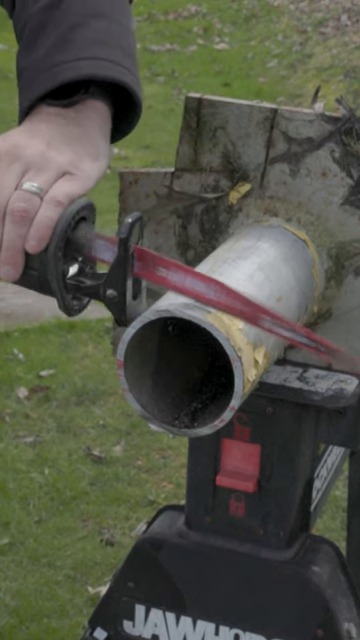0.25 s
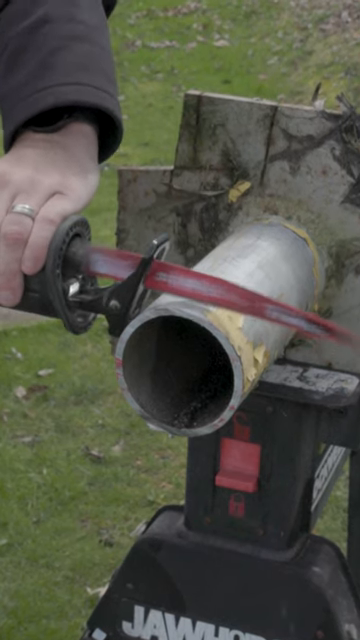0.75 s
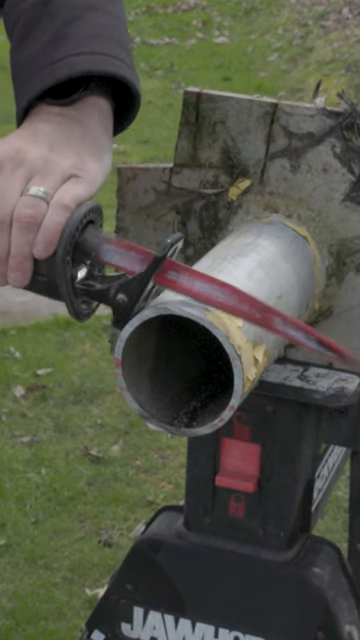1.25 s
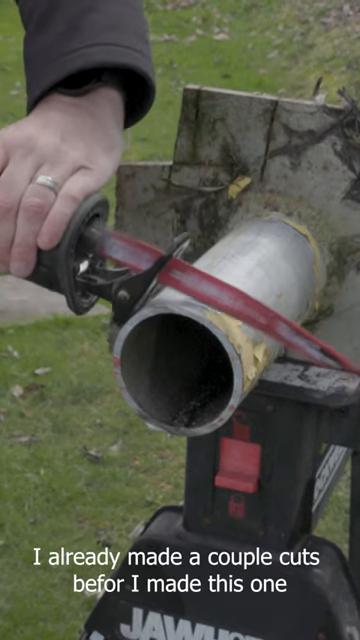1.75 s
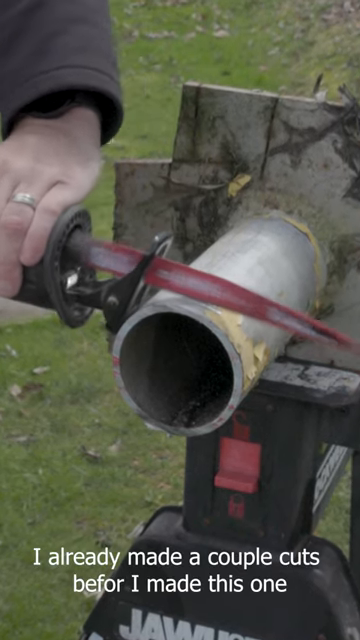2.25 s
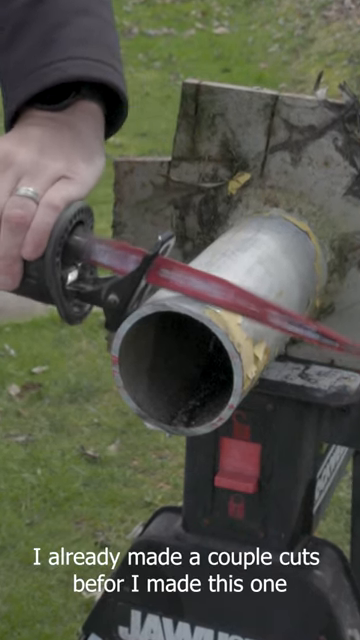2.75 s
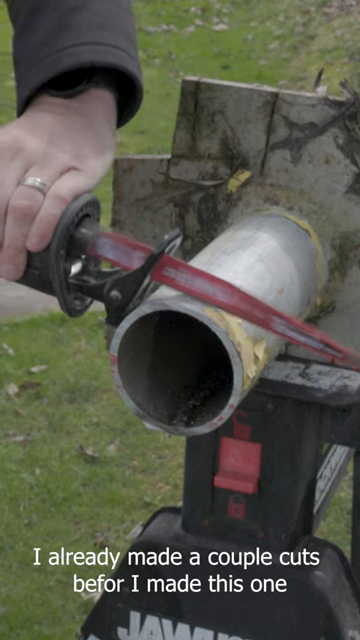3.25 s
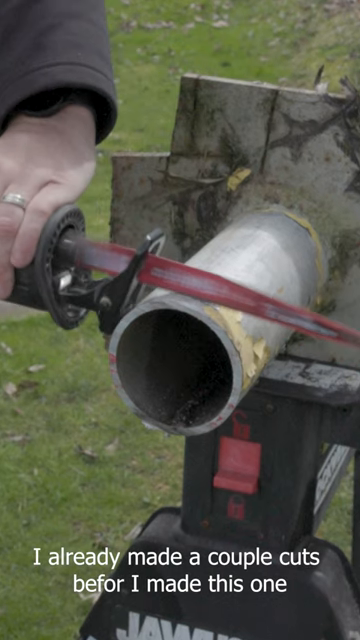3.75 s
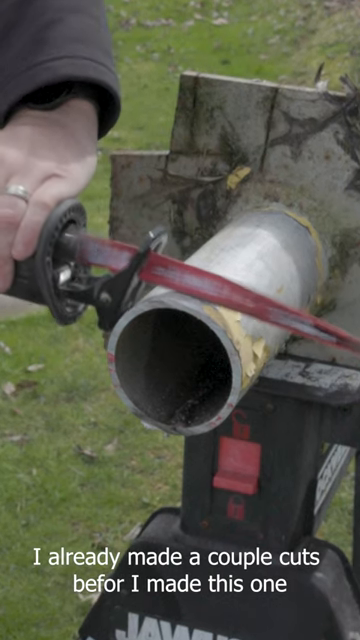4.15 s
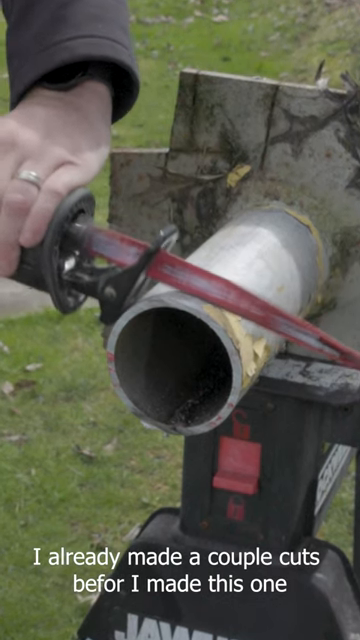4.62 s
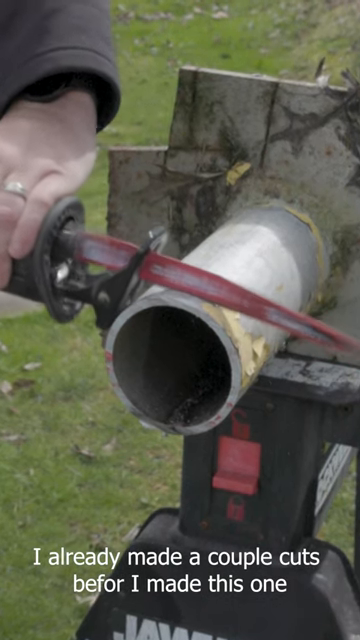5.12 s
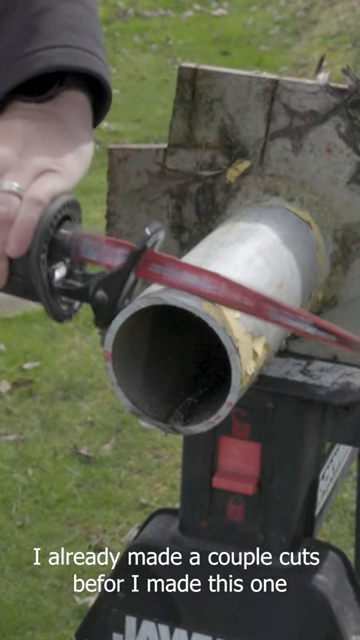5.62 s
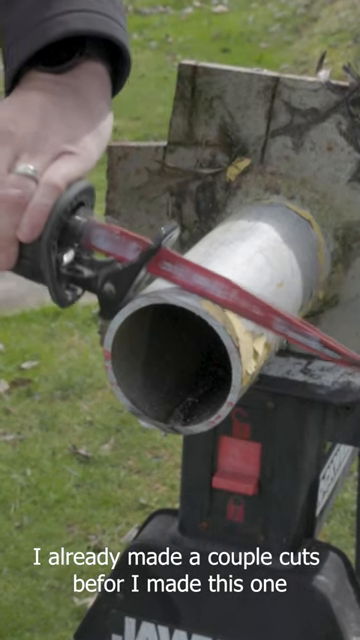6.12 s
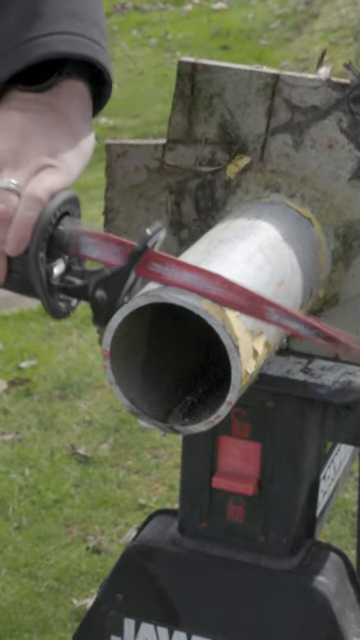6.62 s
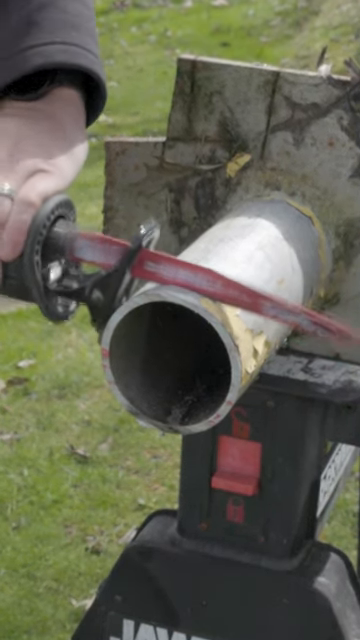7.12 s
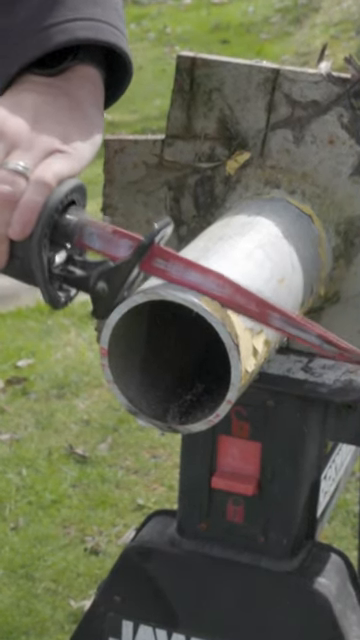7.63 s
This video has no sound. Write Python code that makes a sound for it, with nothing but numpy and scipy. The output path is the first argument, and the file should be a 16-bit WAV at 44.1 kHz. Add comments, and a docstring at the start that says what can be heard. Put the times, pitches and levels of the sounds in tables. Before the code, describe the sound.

Close and dry, a power saw chews through hollow steel on a clamping stand. Its high whine stays steady, trembling slightly under load, over airy hiss and low vibration. About fifty strokes a second rasp into a rough buzz. The pipe's ring flickers between mid and high tones, with dense clanging catches around three seconds, then more tooth chatter and lower ringing. The cutting continues to the end without stopping.

```python
"""First heard is a motor's whine near 3.3 kHz and a rubbing hiss; then a steel pipe rings as a saw cuts it.
A crank drives the reciprocating saw some fifty times a second: sines phase-locked to it make whine and hum.
Each stroke is a rising train of tooth impulses and a burst of spiky noise, shaped by fixed spectra.
The pipe is a bank of decaying modes, restarted by every cut and driven harder by listed knocks.
Filtered noise supplies the cooling air, the rumble, the rattle and a bright ping."""
import sys
import numpy as np
from scipy.fft import rfft, irfft, next_fast_len
from scipy.io import wavfile
from scipy.ndimage import uniform_filter1d, map_coordinates

SR = 44100
rng = np.random.default_rng(int(sys.argv[2]) if len(sys.argv) > 2 else 0)


def waveform_to_disk(signal):
    """Save audio, clipped to [-1, 1], as 16-bit WAV at the path in sys.argv[1]."""
    frames = np.transpose(np.atleast_2d(signal))
    scaled = np.clip(frames, -1, 1) * 32767
    samples = np.round(scaled).astype(np.int16)
    wavfile.write(sys.argv[1], SR, samples)


N = 347508  # samples


def amp(db):
    """Decibel law: 20 dB is a factor of ten in amplitude."""
    return 10 ** (np.asarray(db) / 20)


def unit(x):
    """Normalisation to a root-mean-square value of 1."""
    return x / np.sqrt(np.mean(x ** 2) + 1e-20)


def noise():
    """White noise: equal mean power at all frequencies."""
    return rng.standard_normal(N)


def curves(rows):
    """Linear interpolation: one value per sample for each column after the time."""
    s, *cols = np.transpose(rows)
    return [np.interp(np.arange(N) / SR, s, c) for c in cols]


def wobble(rate):
    """Band-limited fluctuation: a smooth random curve with rate knots a second."""
    return map_coordinates(rng.standard_normal(int(N * rate / SR) + 4), [np.arange(N) * rate / SR])


def filtered(x, response):
    """Linear filtering: the spectrum of x times a response of frequency."""
    m = next_fast_len(N + SR // 2)
    return irfft(rfft(x, m) * response(np.fft.rfftfreq(m, 1 / SR)), m)[:N]


def coloured(x, points):
    """Spectral shaping: x through a (frequency [Hz], gain [dB]) curve, then set to rms 1."""
    f, db = np.transpose(points)
    return unit(filtered(x, lambda hz: amp(np.interp(np.log(hz + 1), np.log(f), db))))


# crank speed: (time [s], rate [strokes per second])
CRANK_SPEED = [(0, 51.5), (0.25, 50.95), (0.4, 50.2), (0.48, 49.96), (0.78, 49.68), (1.09, 50.04),
               (1.74, 50.24), (1.98, 49.58), (2.35, 49.8), (2.79, 49.29), (3.4, 50.29), (3.46, 49.29),
               (3.98, 49.9), (4.14, 48.86), (4.34, 49.26), (4.91, 49.25), (5.12, 48.45), (5.36, 48.86),
               (5.63, 49.01), (5.74, 49.41), (6.36, 49.94), (6.76, 48.48), (7.14, 48.15), (7.4, 49.05),
               (7.67, 49.61), (7.88, 49.6)]


def crank():
    """Phase is the integral of rate: turns of the crank since the start."""
    return np.cumsum(curves(CRANK_SPEED)[0]) / SR


def stroke(centre, scatter_db):
    """Cyclic phase: place in the stroke (-.5 to .5, 0 at centre) and a chance strength for each stroke."""
    turns = crank() - centre + 1.5
    whole = turns.astype(int)
    return turns - whole - .5, amp(scatter_db * rng.standard_normal(whole.max() + 1))[whole]


def bump(place, width):
    """Gaussian window: a smooth swell around place 0."""
    return np.exp(-.5 * (place / width) ** 2)


# shaking of saw and stand, relative levels:
# (time [s], rocking at the stroke rate [dB], middle hum [dB], upper hum [dB], body [dB])
SHAKE_LEVELS = [(0.0, -81, -55, -50.5, -46), (0.28, -79, -55.5, -53.5, -46.5),
                (2.43, -81, -59.5, -49, -45.5), (2.7, -71, -63, -53, -45.5), (2.72, -70, -57, -51.5, -46.5),
                (3.36, -73, -54, -53, -47), (3.49, -66, -56, -45, -45.5), (3.58, -73, -51, -51.5, -46),
                (4.02, -74, -53.5, -47, -47.5), (4.32, -61, -55, -52, -44),
                (5.02, -64, -47.5, -44.5, -45.5), (5.33, -67, -55.5, -54.5, -45),
                (6.28, -63, -52, -48.5, -44.5), (7.13, -68, -55.5, -55.5, -44.5),
                (7.55, -61, -55, -49.5, -45.5), (7.7, -67, -69, -45, -45.5), (7.84, -63, -52, -50, -42.5),
                (7.88, -67, -55, -50, -49)]
# low hum: (multiple of the stroke rate, relative level [dB], wavering before looseness [dB])
LOW_HUM = [(2, -65.5, -1.3), (3, -72, 3), (4, -66.5, 3)]
# middle hum, then upper hum: (multiple of the stroke rate, level relative to its band [dB])
HUM_BANDS = [
    [(5, -4), (6, -3)],
    [(8, -4), (9, 0.5)],
]
# body buzz: (multiple of the stroke rate, level relative to the body [dB])
BODY_ORDERS = [(7, -19.5), (10, -13.5), (11, -21), (12, -42), (13, -18.5), (14, -13.5), (15, -10.5),
               (16, -19), (17, -44)]
# noise spectra of rattle and rumble: (frequency [Hz], relative level [dB])
RATTLE_SPECTRUM = [(25, -60), (70, -42), (150, -19), (300, -3.5), (450, 0), (800, 0), (1000, -27),
                   (1500, -44)]
RUMBLE_SPECTRUM = [(20, -24), (45, -10), (75, -7), (130, -5), (200, -30)]
LOOSE_PER_DB = .05  # the harder the stand rocks, the more the low hum wavers


def harmonic(k, angle, slow, fast):
    """Order analysis: multiple k of the stroke rate, its phase wandering in proportion to k."""
    return np.cos(k * angle + slow * k * wobble(3) + fast * k * wobble(15))


def stand():
    """Forced vibration: saw and stand shake at multiples of the stroke rate, with rattle and rumble."""
    rock_db, *bands_db, body_db = curves(SHAKE_LEVELS)
    angle = 2 * np.pi * crank()
    loose = 1 + LOOSE_PER_DB * (rock_db - rock_db.min())

    hum = amp(rock_db + 3.5 + 2.4 * wobble(12)) * np.cos(angle + 0.13 * wobble(3))
    for k, db, depth_db in LOW_HUM:
        hum += amp(db + 2.0 + depth_db * loose * wobble(8)) * harmonic(k, angle, slow=0.17, fast=0.056)
    for band_db, orders in zip(bands_db, HUM_BANDS):
        for k, db in orders:
            hum += amp(band_db + db + 2.9 * wobble(8)) * harmonic(k, angle, slow=0.13, fast=0.043)

    buzz = np.zeros(N)
    for k, db in BODY_ORDERS:
        buzz += amp(db + 2.0 + 2.5 * wobble(4)) * np.cos(k * angle + 1.12 * wobble(3))

    place, strength = stroke(0.63, scatter_db=5)
    rattle = coloured(noise() * (1.6 + .5 * strength * bump(place, 0.13)), RATTLE_SPECTRUM)

    rumble_db = -69 + 0.43 * (rock_db - rock_db.mean()) + 2.5 * wobble(9)
    rumble = amp(rumble_db) * coloured(noise(), RUMBLE_SPECTRUM)
    return hum + rumble + amp(body_db + 3.0) * (buzz + amp(-2.5) * rattle)


# cooling air: (frequency [Hz], relative level [dB])
AIR_SPECTRUM = [(250, -60), (1200, -32), (2000, -0.5), (3500, 1.5), (5000, -5), (7000, -14.5),
                (10000, -22.5), (12500, -25), (13100, -27), (13700, -27), (15600, -38)]
WHINE_PER_STROKE = 65.632  # whine cycles per turn of the crank


def motor():
    """Frequency modulation: the whine sags each stroke, more under load; overtone and air noise join it."""
    turns = crank()
    load = .55 + .35 * np.clip(50 - curves(CRANK_SPEED)[0], 0, 2)  # a slower crank is loaded harder
    sag = 2 * np.pi * (turns - .42)
    angle = 2 * np.pi * WHINE_PER_STROKE * turns + load * np.sin(sag)
    angle += .35 * wobble(150) + 2.1 * load ** 2 * wobble(35)
    louder_when_slow = 1 - .18 * np.cos(sag)
    whine = amp(-38.0 + 0.4 * load ** 2 * wobble(30)) * louder_when_slow * np.cos(angle)
    overtone = amp(-68) * np.cos(4 * angle + 1.5 * wobble(200))  # at four times the whine
    air = amp(-43.0 + 0.45 * wobble(6)) * coloured(noise(), AIR_SPECTRUM)
    return whine + overtone + air


# bright ping in every cut: (time [s], level [dB])
PING_LEVEL = [(0, -62), (1.7, -67), (1.95, -51.5), (2.4, -64), (5.6, -64), (5.95, -51), (6.6, -52),
              (6.9, -59), (7.3, -56), (7.6, -51.5), (7.88, -55)]
# (frequency [Hz], relative level [dB])
PING_SPECTRUM = [(5200, -40), (5900, -4), (6350, -3), (6800, -5), (7500, -40)]
TEETH_TURN, GRIT_TURN = .72, 0.756  # where in the crank's turn chatter and tearing peak [turns]


def ping():
    """Amplitude-modulated band noise: a narrow bright band flashes at the peak of the cut."""
    place, strength = stroke(GRIT_TURN + 0.055 * wobble(40), scatter_db=0.0)
    flashes = noise() * strength * bump(place, 0.082)
    return amp(curves(PING_LEVEL)[0]) * coloured(flashes, PING_SPECTRUM)


def chips(base):
    """Heavy-tailed noise: chips tear mostly in the cut, a little on the way back; base never stops."""
    place, strength = stroke(GRIT_TURN + 0.12 * wobble(40), scatter_db=1.5)
    way_back = bump(np.abs(place) - .5, 0.048)
    swell = base + strength * bump(place, 0.089) + 0.64 * way_back
    spikes = amp(3.4 * np.minimum(rng.exponential(size=N), 7))
    return unit(swell * noise() * spikes)


# strokes that knock the pipe hard, levels before the gains below: (time [s], peak [dB], then relative
# to the peak: first, second, third and upper mode family [dB], tearing burst [dB])
HARD_KNOCKS = [(0.405, -27, -21, -15, -9, -23, -21), (0.848, -19, -28, -14, -6, -28, -24),
               (0.8884, -19, -27, -22, -8, -22, -24), (0.907, -14, -18, -16, -8.5, -24, -21),
               (0.9697, -18, -16, -8, -16, -29, -31), (0.9884, -18, -21, -22, -9, -31, -26),
               (1.0286, -18, -13, -14, -11, -28, -25), (1.1478, -22, -23, -12, -9, -33, -24),
               (1.1682, -19, -31, -19, -7.5, -29, -25), (1.2077, -20, -10, -16, -9, -30, -22),
               (1.2694, -20.5, -12, -18, -11, -26, -19), (1.3708, -23, -9, -9, -21, -28, -25),
               (1.4466, -19.5, -9, -5, -26, -30, -24), (1.8884, -30, -21, -21, -22, -28, -6),
               (1.9066, -29, -17, -15, -21, -27, -20), (1.9474, -27, -22, -14, -20, -31, -11),
               (1.9684, -19.5, -21, -4, -23, -30, -22), (2.0093, -17.5, -13, -6, -24, -31, -19),
               (2.3486, -21.5, -12, -4, -17, -28, -25), (2.389, -19, -23, -12, -6, -33, -27),
               (2.5311, -23, -22, -4, -15, -24, -25), (2.5494, -19.5, -23, -17, -9, -17, -29),
               (2.5704, -18, -24, -18, -8, -27, -27), (2.5904, -19, -27, -14, -10, -23, -27),
               (2.609, -13, -26, -10, -16, -23, -19), (2.6504, -16, -32, -12, -15, -23, -19),
               (2.6703, -15, -30, -13, -15, -29, -20), (2.7134, -15, -25, -12, -10, -33, -24),
               (2.7734, -21, -22, -19, -8, -21, -22), (2.832, -16, -30, -16, -8, -32, -25),
               (2.8534, -17, -27, -15, -8, -29, -22), (2.8739, -14.5, -31, -15, -9.5, -31, -23),
               (2.9138, -16.5, -29, -9, -12, -26, -31), (2.9562, -16.5, -16, -14, -14, -27, -31),
               (2.9951, -20, -21, -18, -7, -29, -23), (3.0155, -16, -29, -18, -10, -32, -25),
               (3.0345, -17, -25, -10, -18, -24, -23), (3.0534, -24, -25, -17, -17, -21, -17),
               (3.0744, -18, -28, -6, -18, -29, -22), (3.0949, -15.5, -24, -10, -15, -24, -25),
               (3.2146, -14.5, -11, -12, -14, -32, -26), (3.2324, -15, -25, -12, -19, -33, -26),
               (3.413, -16, -20, -12, -8, -31, -24), (3.4335, -14, -20, -10, -11, -27, -26),
               (3.4545, -14, -25, -11, -9, -26, -21), (3.4945, -17, -27, -15, -12, -30, -21),
               (3.514, -16, -25, -15, -12, -32, -26), (3.5359, -19, -22, -21, -7, -31, -27),
               (3.5763, -16.5, -16, -9, -9, -31, -32), (3.6162, -22, -25, -16, -15, -31, -24),
               (3.6566, -22, -23, -16, -15, -21, -24), (3.698, -16, -32, -11, -11.5, -29, -18),
               (3.7389, -20, -23, -19, -9, -25, -24), (3.7788, -19.5, -25, -19, -5.5, -29, -30),
               (3.9389, -19.5, -27, -7, -21, -18, -25), (4.2223, -19, -14, -22, -17, -26, -23),
               (4.2847, -17, -25, -11, -14, -32, -26), (4.3021, -14, -13.5, -10, -14, -36, -26),
               (4.525, -20, -25, -5, -19, -27, -19), (4.624, -20, -25, -3, -21, -26, -23),
               (4.6654, -16, -17, -11, -25, -25, -17), (4.7556, -22, -26, 0, -24, -28, -24),
               (4.81, -15.5, -25, -9, -21, -19, -25), (4.9334, -18, -27, -14, -8, -28, -24),
               (4.9516, -17, -30, -11, -10, -32, -17), (4.9924, -16, -26, -10, -13, -26, -21),
               (5.035, -16, -27, -14, -16, -27, -24), (5.0744, -16.5, -23, -19, -8, -30, -22),
               (5.0954, -18, -24, -12, -7, -30, -25), (5.1392, -19, -20, -9, -17, -21, -15),
               (5.1786, -13.5, -17, -9.5, -20, -23, -17), (5.2214, -26, -16, -21, -16, -26, -15),
               (5.3014, -18, -21, -12, -14, -28, -24), (5.342, -17.5, -14, -18, -11, -21, -25),
               (5.6116, -16, -22, -8.5, -16, -29, -32), (5.7734, -19, -21, -9, -6.5, -22, -22),
               (5.8324, -18, -15, -6, -16, -29, -20), (5.8965, -16, -13, -3.5, -25, -28, -18),
               (5.9314, -16.5, -27, -3, -22, -31, -26), (5.9564, -32, -24, -17, -17, -28, -17),
               (5.9724, -23, -19, -20, -20, -27, -20), (6.0337, -26, -30, -7, -26, -35, -27),
               (6.0544, -35, -18, -10, -17, -24, -15), (6.0954, -24, -22, -17, -11, -31, -22),
               (6.1164, -22, -10, -19, -21, -22, -18), (6.1379, -23, -19, -14, -24, -27, -18),
               (6.1833, -23, -26, 0, -25, -28, -20), (6.3735, -19, -26, -15, -13, -25, -24),
               (6.3954, -21, -23, -17, -22, -25, -22), (6.4136, -20, -20, -15, -14, -23, -15),
               (6.4374, -17.5, -25, -7, -19, -25, -19), (6.493, -22, -19, -14, -16, -28, -25),
               (6.538, -19, -10, -25, -19, -22, -15), (6.6393, -16, -13, -7.5, -17, -32, -25),
               (6.6992, -19, -23, -4, -19, -24, -24), (6.739, -12.5, -19, -9, -18, -30, -23),
               (6.7594, -18, -23, -3, -19, -24, -22), (6.8194, -20, -24, -5, -21, -30, -23),
               (6.9474, -18, -17, -7, -22, -32, -26), (6.992, -20.5, -19, -8, -16, -32, -18),
               (7.0394, -23, -19, -7, -23, -26, -22), (7.1591, -23, -29, -20, -23, -28, -19),
               (7.2484, -21, -14, -9, -23, -27, -23), (7.322, -19, -10, -6, -18, -30, -27),
               (7.3597, -18.5, -23, -1, -15, -31, -26), (7.441, -15.5, -17, -5.5, -15, -22, -26),
               (7.4859, -16.5, -19, -5, -24, -30, -19), (7.5038, -16, -24, -5, -24, -28, -25),
               (7.5243, -15.5, -10, -11, -25, -33, -19), (7.5454, -17, -24, -6, -26, -29, -23),
               (7.583, -17.5, -27, -3, -24, -32, -23), (7.669, -18, -6, -8, -18, -25, -22),
               (7.7283, -13, -10, -9, -23, -25, -24)]


def catches():
    """Exponential decay: each hard stroke tears with a noise burst falling 60 dB in 21 ms."""
    force, t = np.zeros(N + SR), np.arange(SR // 50) / SR
    for s, db, *_, burst_db in HARD_KNOCKS:
        decay = amp(db + burst_db + 8.5 - 60 * t / 0.021)
        force[round(s * SR):][:len(t)] += decay * rng.standard_normal(len(t))
    return force[:N]


# the cut, relative levels:
# (time [s], band of the teeth [dB], power share of tooth chatter [0-1], rasp [dB], fizz [dB])
CUT_LEVELS = [(0.0, -38, 0.1, -50, -62), (0.35, -38, 0.16, -47.5, -60), (1.38, -37.5, 0.15, -48, -64),
              (1.58, -37.5, 0.03, -49.5, -62), (2.79, -36, 0.41, -46.5, -56), (3.36, -36.5, 0.16, -47, -61),
              (3.47, -35.5, 0.4, -45.5, -53), (3.56, -36.5, 0.3, -47, -57), (3.93, -35, 0.25, -47, -61),
              (4.5, -30.5, 0.77, -47, -58), (4.7, -31.5, 0.82, -47, -58), (5.02, -33.5, 0.42, -44.5, -55),
              (5.51, -35, 0.4, -49, -62), (5.97, -31.5, 0.72, -48, -62), (7.09, -37, 0.45, -48.5, -65),
              (7.35, -34, 0.35, -50, -63), (7.37, -31.5, 0.7, -48, -64), (7.75, -32.5, 0.36, -46.5, -56),
              (7.84, -30.5, 0.3, -49, -61), (7.88, -36, 0.5, -47, -60)]
# spectra of rasp and fizz: (frequency [Hz], relative level [dB])
RASP_SPECTRUM = [(250, -60), (1200, 1), (2000, 10), (3500, 4.5), (4700, 2.5), (5500, -0.5), (6400, 0.5),
                 (7200, -5), (8500, -11), (10000, -51)]
FIZZ_SPECTRUM = [(1500, -60), (5000, -16), (7500, -3), (9000, 5), (12000, -2), (14000, -2), (15600, -10)]


def grit():
    """Fracture noise: the tearing sounds as a rasp and a finer fizz that pulse with the stroke."""
    rasp_db, fizz_db = curves(CUT_LEVELS)[2:]
    hard = catches()
    rasp = amp(rasp_db + 8 + 0.46 * wobble(12)) * chips(base=0.72) + amp(-3) * hard
    fizz = amp(fizz_db - 1.3 + 1.3 * wobble(25)) * chips(base=0.51) + amp(-23.0) * hard
    return coloured(rasp, RASP_SPECTRUM) * np.std(rasp) + coloured(fizz, FIZZ_SPECTRUM) * np.std(fizz)


# chatter and rub: (frequency [Hz], relative level [dB])
TEETH_SPECTRUM = [(200, -53), (500, -34), (900, -8.5), (1150, -1), (1400, -3), (1750, -2), (2000, -24),
                  (3000, -64)]


def teeth():
    """Impulse train: teeth pass ever faster through the cutting stroke, over the noise of a rubbing blade."""
    db, share = curves(CUT_LEVELS)[:2]
    share = np.clip(share, 0, 1)
    place, strength = stroke(TEETH_TURN + .015 * wobble(40), scatter_db=2.0)
    tooth_hz = 1190 + 900 * np.clip(place, -.3, .3)
    tooth_hz = tooth_hz * (1 + .06 * wobble(35) + .03 * wobble(300))
    passed = np.floor(np.cumsum(tooth_hz) / SR)
    blows = np.diff(passed, prepend=0) * amp(2.3 * noise())  # one impulse a tooth, uneven in strength
    chatter = coloured(blows * strength * bump(place, 0.14), TEETH_SPECTRUM)
    rub = coloured(noise() * amp(0.47 * wobble(25)), TEETH_SPECTRUM)
    return amp(db + 2.0) * (np.sqrt(share) * chatter + np.sqrt(1 - share) * rub)


# five families of pipe modes, first to highest: (frequency [Hz], undamped t60 [s], relative level [dB])
PIPE_MODES = [
    [(926, .16, 0)],
    [(1636, .14, 0)],
    [(2618, .14, 0)],
    [(3704, .12, -5), (3890, .12, -13), (4440, .12, 0), (4850, .1, -7), (4960, .12, -12), (5170, .1, -12)],
    [(8330, .1, 0), (8700, .12, -7), (9530, .1, -8), (10800, .1, -16)],
]
# first to upper family: (share of t60 left after a hard knock [0-1])
KNOCK_DAMPING = [1, 0.71, 0.71, 0.74]


def knocks(family):
    """Energy superposition: squared knock envelopes in one family, a quick rise, then the ring dies."""
    power, t = np.zeros(N + SR), np.arange(SR // 5) / SR
    rise = 1 - np.exp(-t / 0.0025)
    t60 = KNOCK_DAMPING[family] * PIPE_MODES[family][0][1]
    for row in HARD_KNOCKS:
        s, peak_db, family_db = row[0], row[1], row[family + 2]
        power[round(s * SR):][:len(t)] += (amp(peak_db + family_db - 60 * t / t60) * rise) ** 2
    return power[:N]


def soften(x):
    """Moving average: steps become 4.5 ms ramps."""
    return uniform_filter1d(x, int(.0045 * SR))


def mode(hz, t60, crank_turns, speed):
    """Modal decay: every cut restarts the mode at a new strength and phase; returns tone and swell."""
    turns = crank_turns - GRIT_TURN + 1.083 + 0.035 * wobble(40)
    whole = turns.astype(int)
    jump, strength = rng.standard_normal((2, whole.max() + 1))
    shift = 1.6 * np.cumsum(jump)[whole]
    angle = 2 * np.pi * hz * np.arange(N) / SR + 0.52 * wobble(90)
    # the old ring fades into the new one, dipping where their phases oppose
    tone = soften(np.cos(shift)) * np.cos(angle) - soften(np.sin(shift)) * np.sin(angle)
    since = (turns - whole) / speed  # seconds since the restart
    scatter_db = 3
    return tone, unit(soften(amp(scatter_db * strength[whole] - 60 * since / t60)))


# steady drive of each mode family, relative levels:
# (time [s], third [dB], second [dB], first [dB], upper [dB], highest [dB])
RING_DRIVE = [(0.0, -52, -52, -50, -57, -65), (0.04, -53, -41, -46, -54, -64),
              (0.46, -41, -44, -42.5, -54, -65), (0.74, -48, -44, -45, -55, -69),
              (0.9, -37, -39, -44, -45, -64), (1.05, -38, -38.5, -50, -58, -69),
              (1.76, -45, -35, -47.5, -51, -64), (2.06, -38.5, -33.5, -39, -53, -62),
              (2.11, -35, -33, -50, -52, -64), (2.3, -41, -58, -46, -59, -67),
              (2.37, -37, -36, -39.5, -56, -74), (2.65, -25.5, -31, -47, -41, -63),
              (2.74, -22.5, -31, -43, -47, -66), (2.9, -31.5, -37, -43, -47, -61),
              (3.18, -36, -38, -47, -49, -65), (3.25, -37, -25.5, -48, -51, -59),
              (3.33, -41, -37, -60, -42, -68), (3.49, -27, -34, -42, -47, -59),
              (3.75, -31.5, -39, -45.5, -49, -66), (4.61, -39, -30, -42.5, -49.5, -64),
              (4.91, -32.5, -42, -48, -44, -62), (4.98, -26.5, -28.5, -53, -45, -53),
              (5.2, -35, -44, -33, -54, -63), (5.31, -35, -35.5, -44.5, -50, -69),
              (6.69, -41.5, -32.5, -44, -50, -65), (7.16, -48, -35, -44, -54, -68),
              (7.55, -38.5, -40, -45, -52, -65), (7.88, -37, -33, -43, -47, -63)]
# first to highest family: (share of t60 left while the blade rests in the cut [0-1])
BLADE_DAMPING = [1, 1, .7, 0.94, 0.95]
# first to highest family: (share of the ring choked at the tightest grip [0-1])
GRIP_CHOKE = [0.12, 0.16, 0.41, .5, .5]
GRIP_TURN = .66  # the blade grips the pipe just before each cut [turns]


def pipe():
    """Modal superposition: families ring with the cut's flickering drive and, but the highest, with knocks."""
    third, second, first, upper, highest = curves(RING_DRIVE)
    drive_db = [first - 1.5 + 2.1 * wobble(14),
                second - 2.5 + 2.8 * wobble(14),
                third - 3 + 2.5 * wobble(14),
                upper - .8 + 1.64 * wobble(14),
                highest - .8 + 2.1 * wobble(8)]
    # these gains multiply power
    struck = [amp(-9) * knocks(0), amp(-2.5) * knocks(1), amp(2) * knocks(2), amp(2.5) * knocks(3), 0]
    turns, speed = crank(), curves(CRANK_SPEED)[0]
    grip = bump(stroke(GRIP_TURN, scatter_db=0)[0], 0.07)

    total = np.zeros(N)
    for modes, db, extra, left, depth in zip(PIPE_MODES, drive_db, struck, BLADE_DAMPING, GRIP_CHOKE):
        free = 1 - np.clip(depth, 0, 1) * grip
        steady = amp(db)
        for hz, t60, level_db in modes:
            tone, swell = mode(hz, left * t60, turns, speed)
            strength = np.sqrt((steady * swell) ** 2 + extra)
            total += amp(level_db + 4) * strength * tone * free
    return total


def scene():
    """Linear superposition: all sources add in one channel."""
    return (stand() + motor() + ping() + grit() + teeth() + pipe())[None]


def record(dry):
    """Saturation and band-limiting: peaks are rounded, then the lowest bass and the top are removed."""
    top, knee = .16, 5  # ceiling of the rounding, sharpness of its bend
    low_hz, top_hz = 33, 15720
    rounded = dry[0] / (1 + np.abs(dry[0] / top) ** knee) ** (1 / knee)
    return filtered(rounded, lambda hz: (hz < top_hz) / (1 + (low_hz / (hz + 1)) ** 4))[None]


dry = scene()
out = record(dry)
waveform_to_disk(out)
```